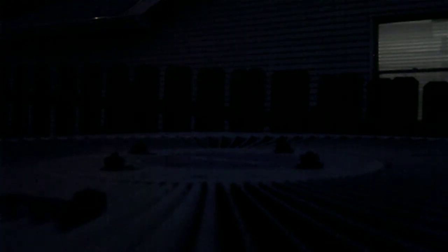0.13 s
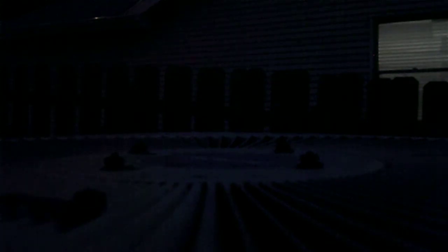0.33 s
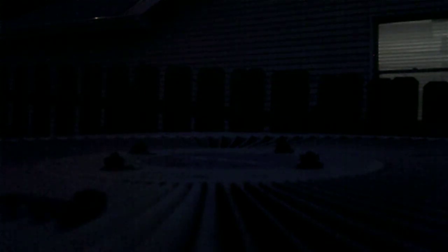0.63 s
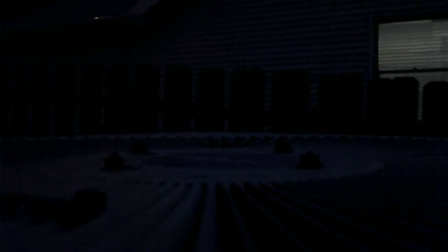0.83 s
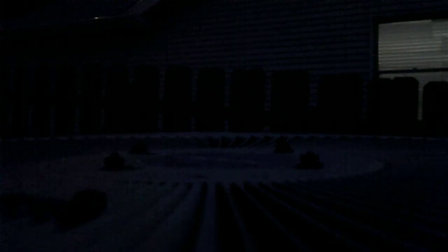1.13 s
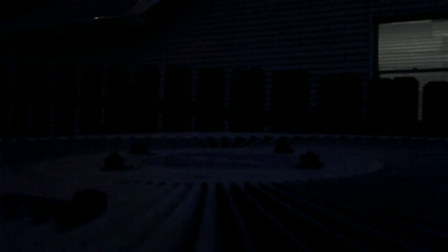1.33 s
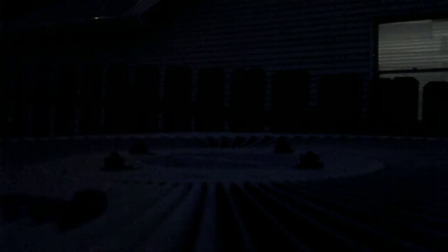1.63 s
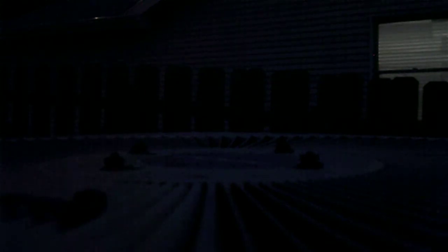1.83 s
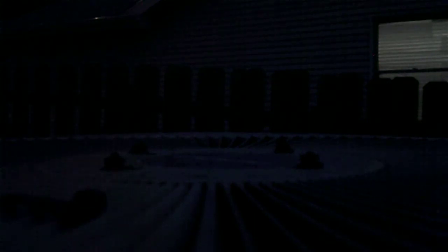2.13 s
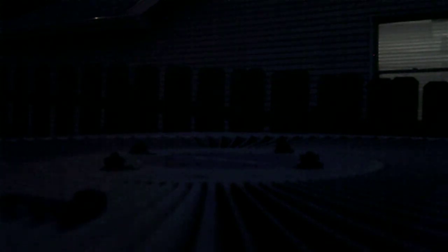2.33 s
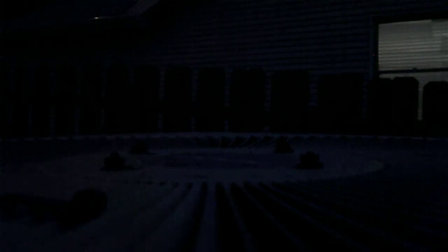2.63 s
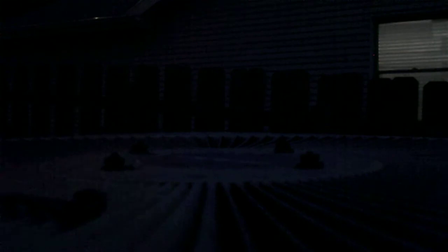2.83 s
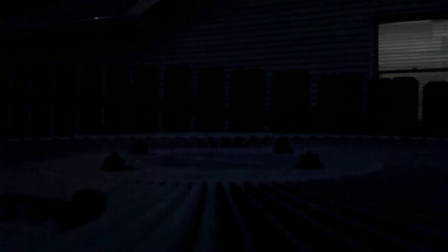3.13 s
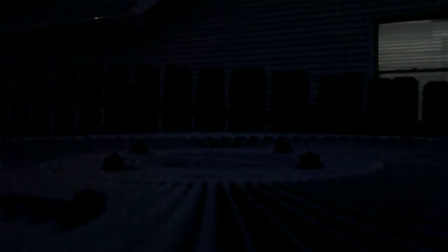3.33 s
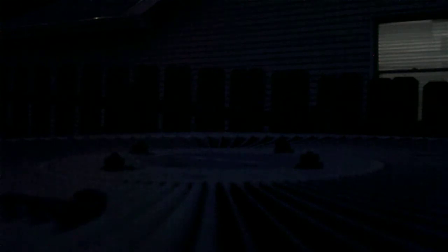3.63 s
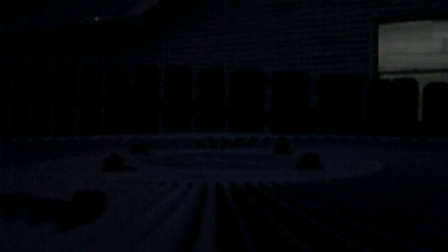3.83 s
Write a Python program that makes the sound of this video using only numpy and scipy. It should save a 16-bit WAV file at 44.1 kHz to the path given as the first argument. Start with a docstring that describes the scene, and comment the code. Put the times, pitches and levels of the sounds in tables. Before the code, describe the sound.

Outdoor air conditioner slams on with loud metallic clatter after a long quiet night hum

```python
"""Outdoor air conditioner starting at night

Far traffic (shaped noise), fan hum (wavering sines) and faint electronic ticking (filtered pulses, hiss puffs).
Then the contactor slams and the sheet-metal cabinet rings (decaying modes under noise cracks).
The compressor lurches into motion: a hum of gliding pitch, rumbling panels, jolts hard enough to clip.
The small microphone sits on the top grille."""
import sys
import numpy as np
from scipy import signal
from scipy.fft import rfft, irfft, next_fast_len
from scipy.io import wavfile
from scipy.ndimage import uniform_filter1d, map_coordinates

SR = 44100
rng = np.random.default_rng(int(sys.argv[2]) if len(sys.argv) > 2 else 0)


def master(y):
    """Save y as 16-bit WAV."""
    cut = np.clip(np.atleast_2d(y).T, -1, 1)
    pcm = np.round(cut * 32767)  # scale
    wavfile.write(sys.argv[1], SR, pcm.astype(np.int16))


def magnitude_from_level(level_db):
    """Linear magnitude for a level in decibels (20 dB per decade)."""
    exponent = np.asarray(level_db, float) / 20
    return 10 ** exponent


N = 176400  # samples, 4 s


def unit(x):
    """Scales x to rms 1."""
    return x / np.sqrt(np.mean(x ** 2) + 1e-20)


def along(points, hz):
    """Interpolates (Hz, value) points on a log frequency axis."""
    point_hz, value = np.transpose(points)
    return np.interp(np.log(hz + 1), np.log(point_hz + 1), value)


def wobble(knots_per_s):
    """Smooth random curve through normally distributed knots."""
    knots = rng.standard_normal(int(N * knots_per_s / SR) + 4)
    return map_coordinates(knots, [np.arange(N) * knots_per_s / SR])


def filtered(x, response):
    """Multiplies the spectrum of x by a response of frequency."""
    size = next_fast_len(len(x) + 8192)
    gain = response(np.fft.rfftfreq(size, 1 / SR))
    return irfft(rfft(x, size) * gain, size)[:len(x)]


def noise(spectrum, size=N):
    """Noise of rms 1 coloured by (Hz, dB) points."""
    return unit(filtered(rng.standard_normal(size), lambda f: magnitude_from_level(along(spectrum, f))))


def bell(centre_hz, width_hz):
    """Gaussian band response, 1 at its centre."""
    return lambda f: np.exp(-2 * ((f - centre_hz) / width_hz) ** 2)


def traffic_wash():
    """Night air and far traffic: shaped noise, its level patchy over time and frequency."""
    # spectrum shape: hz, relative density_db
    air = [(5, -39), (8, 4.5), (27, 1), (60, -3.5), (100, -14), (199, -19), (282, -21.5), (330, -25.5),
           (1050, -23), (1200, -19.5), (1770, -30), (2110, -40.5), (2670, -41), (3400, -56), (4200, -67.5),
           (5100, -73), (6000, -68), (7900, -62.5), (8700, -78.5), (10000, -120)]
    z = signal.stft(rng.standard_normal(N), nperseg=512)[2]
    field = uniform_filter1d(rng.standard_normal(z.shape), 5, 0)  # across bins
    field = uniform_filter1d(field, 30, 1)  # across frames
    patchy = signal.istft(z * magnitude_from_level(0.62 * unit(field)), nperseg=512)[1][:N]
    return magnitude_from_level(-30) * unit(filtered(patchy, lambda f: magnitude_from_level(along(air, f))))


def fan_hum():
    """Distant fans: sines wandering in level and phase, two of them coming and going."""
    # distant fan tones: pitch_hz, level_db before trim
    fans = [(75.4, -39.5), (290.7, -50.5), (344.5, -56.5), (460, -62), (516.8, -56), (576, -55.5),
            (1157, -57)]
    # tones that come and go, lower and upper: pitch_hz
    wavering_hz = (121.2, 235.7)
    # their levels before trim: time_s, lower_db, upper_db
    wavering = [(0.0, -43, -51), (0.05, -42.5, -47.5), (0.4, -38.5, -58), (0.51, -57, -76),
                (0.53, -54, -56), (0.74, -42, -50.5), (1.56, -44, -64), (1.66, -46.5, -46),
                (1.89, -41.5, -43), (2.18, -57, -47.5), (2.29, -49, -66), (2.37, -36.5, -49),
                (2.56, -60, -48), (2.99, -45.5, -45.5), (3.35, -55, -60), (3.5, -65, -48)]
    t = np.arange(N) / SR
    out = np.zeros(N)
    for hz, db in fans:
        level = magnitude_from_level(db + 1.5 + 3.03 * wobble(2.65))
        out += level * np.sin(2 * np.pi * hz * t + 0.85 * wobble(3.93))
    time_s, *levels_db = np.transpose(wavering)
    for hz, db in zip(wavering_hz, levels_db):
        level = magnitude_from_level(np.interp(t, time_s, db) + 3)
        out += level * np.sin(2 * np.pi * hz * t + 0.3 * wobble(2.3))
    return out


def far_vehicle():
    """A far vehicle swells and fades: band noise under a Gaussian envelope."""
    peak_s, length_s, peak_db = 0.6, 0.49, -45.5
    t = np.arange(N) / SR
    swell = magnitude_from_level(peak_db) * np.exp(-((t - peak_s) / length_s) ** 2)
    return swell * unit(filtered(rng.standard_normal(N), bell(820, 180)))


def ticking():
    """Steady electronic ticking: evenly spaced pulses of random strength, filtered to treble."""
    # spectrum shape: hz, relative density_db
    tick_spectrum = [(2500, -46), (3600, -7), (5000, -22), (7200, -5), (8200, -8), (8900, -35),
                     (10000, -70)]
    rate_hz, start_s, rms_db = 90.9, 0.0003, -80
    at_s = np.arange(start_s, N / SR - 0.001, 1 / rate_hz)
    pulses = np.zeros(N)
    pulses[np.round(at_s * SR).astype(int)] = magnitude_from_level(2.5 * rng.standard_normal(len(at_s)))
    return magnitude_from_level(rms_db) * unit(filtered(pulses, lambda f: magnitude_from_level(along(tick_spectrum, f))))


def hiss_puffs():
    """Short puffs of electronic treble hiss: band noise through flat-topped gates."""
    # puffs: centre_s, level_db
    puffs = [(.33, -70), (.53, -75), (.73, -71), (1.125, -77), (1.32, -68), (1.52, -71), (1.74, -71),
             (2.125, -68), (2.325, -73), (2.525, -71), (2.74, -71), (3.125, -71), (3.33, -70), (3.53, -67)]
    half_length_s = 0.009
    t = np.arange(N) / SR
    gate = sum(magnitude_from_level(db) * np.exp(-((t - s) / half_length_s) ** 4) for s, db in puffs)
    return gate * unit(filtered(rng.standard_normal(N), bell(7860, 1000)))


def jolts():
    """Each blow cracks and rings the panel modes, most those near its pitch; part of the ring is soon damped."""
    # panel modes: pitch_hz
    mode_hz = (83, 234, 327, 417, 476, 600, 775, 815, 876, 922, 1088, 1420, 1480, 1700, 1900, 2110, 2417,
               2650, 3430, 4680, 6300)
    # same modes: level_db before random loss, t60_s
    modes = [(-5.5, 0.37), (0.5, 0.25), (-3.5, 0.61), (-3, 0.26), (-0.5, 0.21), (1.5, 0.17), (2, 0.1),
             (-7, .3), (-1.5, 0.38), (0, .3), (-5, 0.47), (-5, .3), (-5.5, 0.24), (-9, 0.046), (-32, 0.11),
             (-9.5, 0.2), (-6, .2), (-36.5, .2), (-22.5, .4), (-28.5, .4), (-40, .4)]
    # blows: start_s, level_db, pitch_hz, damped share of ring (0-1), crack_db relative to blow level
    blows = [(3.5585, 3.5, 2000, .7, -4), (3.562, 5, 945, 0.87, -11.5), (3.578, -1.5, 2400, .6, -6),
             (3.612, -6.5, 1450, 0.38, -5.5), (3.648, -4, 590, .7, -11.5), (3.74, -6, 1430, .6, -21.5),
             (3.766, -3, 906, .7, -21.5), (3.787, -6, 923, 0.18, -12), (3.812, -6, 1480, .5, -11),
             (3.835, 3, 620, 1, -8.5), (3.886, -0.5, 775, 1, -9), (3.915, 0, 480, 0.54, -14),
             (3.932, 4.5, 468, 0.87, -10), (3.951, -6, 1024, 0.52, -6), (3.975, -8, 407, .4, -11)]
    # crack spectrum shape: hz, relative density_db
    crack_spectrum = [(100, -31), (600, 6), (1700, 2), (3000, -9.5), (4200, -26.5), (8000, -38.5)]
    reach_octaves, rise_s, crack_t60_s, damped_t60_s = 0.24, 0.0022, 0.14, 0.17
    t = np.arange(SR // 2) / SR
    out = np.zeros(N + SR)
    hz = np.array(mode_hz)[:, None]
    level_db, t60_s = np.transpose(modes)[:, :, None]
    for start_s, blow_db, pitch_hz, damped, crack_db in blows:
        level_draw, phase_draw = rng.random((2, len(modes), 1))
        near = np.exp(-(np.log2(hz / pitch_hz) / reach_octaves) ** 2) + 0.12
        decay = magnitude_from_level(level_db + 2.1 * (level_draw - 2) - 60 * t / t60_s)
        ring = (near * decay * np.sin(2 * np.pi * (hz * t + 0.21 * phase_draw))).sum(0)
        ring = ring * (1 - damped + damped * magnitude_from_level(-60 * t / damped_t60_s))
        crack = magnitude_from_level(crack_db - 60 * t / crack_t60_s) * noise(crack_spectrum, size=len(t))
        onset = 1 - np.exp(-t / rise_s)
        out[round(start_s * SR):][:len(t)] += magnitude_from_level(blow_db) * (ring + crack) * onset
    return out[:N]


def compressor():
    """Motor hum of gliding pitch with fluttering overtones; cabinet vibration as rumbling noise."""
    # motor pitch: time_s, pitch_hz
    hum_pitch = [(3.56, 117), (3.68, 116), (3.72, 110), (3.78, 104), (3.82, 115), (3.89, 119), (3.95, 100),
                 (4.0, 114)]
    # motor hum: time_s, level_db before trim
    hum_level = [(3.56, -41.5), (3.596, -15.5), (3.65, -15), (3.676, -23), (3.705, -19), (3.74, -37.5),
                 (3.78, -37.5), (3.812, -13.5), (3.845, -13.5), (3.876, -10), (3.905, -14), (3.928, -10.5),
                 (3.95, -15), (3.975, -11), (4.0, -13)]
    # overtones: multiple, mid level_db relative to fundamental
    overtones = [(2, -14), (3, -17.5), (4, -13)]
    # cabinet vibration: time_s, level_db
    shaking = [(3.56, -13), (3.63, -11.5), (3.7, -16), (3.78, -16), (3.85, -11.5), (3.93, -13),
               (4.0, -14.5)]
    # rumble spectrum shape: hz, relative density_db
    rumble_spectrum = [(15, -44.5), (25, -12), (83, 0), (119, -1.5), (230, -2), (644, -7), (885, 2),
                       (1050, -9.5), (1480, -9), (1800, -20.5), (2500, -27.5), (3500, -34.5), (4100, -64.5),
                       (8000, -69), (10000, -110)]
    t = np.arange(N) / SR
    hz, hum_db, shake_db = (np.interp(t, *np.transpose(rows)) for rows in (hum_pitch, hum_level, shaking))
    phase = 2 * np.pi * np.cumsum(hz) / SR
    hum = np.sin(phase)
    for multiple, db in overtones:
        hum += magnitude_from_level(db + 3.6 * wobble(25)) * np.sin(multiple * phase)
    rumble = magnitude_from_level(shake_db) * noise(rumble_spectrum)
    fade_in = np.clip((t - hum_level[0][0]) / 0.017, 0, 1)  # 17 ms
    return fade_in * (magnitude_from_level(hum_db + 3.5) * hum + rumble)


def scene():
    """Sums all sources at the microphone, one channel."""
    background = traffic_wash() + fan_hum() + far_vehicle() + ticking() + hiss_puffs()
    return (background + jolts() + compressor())[None]


def clip(x, top, hardness):
    """Flattens peaks at top; higher hardness gives a sharper knee."""
    return x / (1 + np.abs(x / top) ** hardness) ** (1 / hardness)


def tone(f):
    """Response: the microphone's bright peak and a steep low-pass."""
    presence = magnitude_from_level(4.5 * bell(7000, 2000)(f))
    return presence / (1 + (f / 8460) ** 30)


def roll_off(x):
    """The treble ends steeply here."""
    return signal.sosfilt(signal.butter(12, 15830, fs=SR, output="sos"), x)


def record(dry):
    """The input clips, is brightened and low-passed; overshoots clip again at the output."""
    x = clip(dry[0], top=0.7, hardness=40)
    x = filtered(x, tone)
    x = np.clip(x, -0.7, 0.7)
    return roll_off(x[None])


dry = scene()
out = record(dry)
master(out)
```